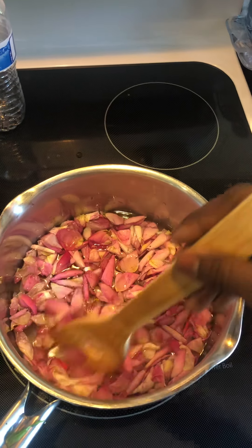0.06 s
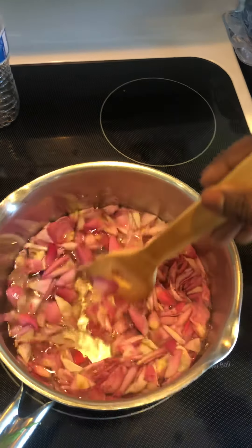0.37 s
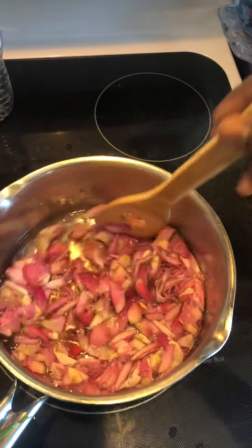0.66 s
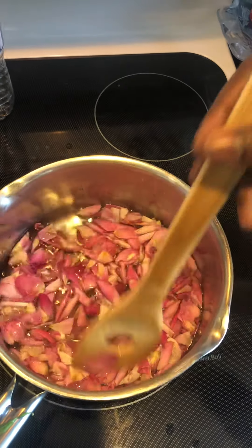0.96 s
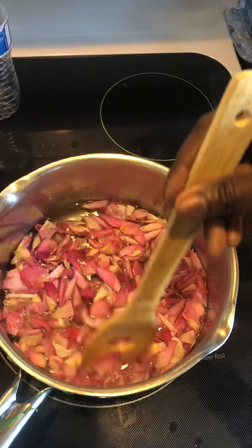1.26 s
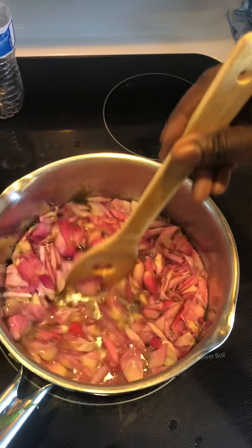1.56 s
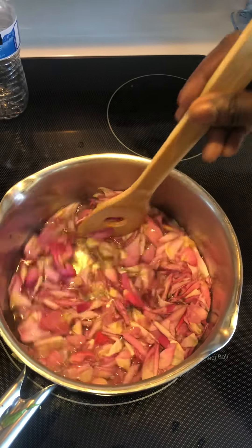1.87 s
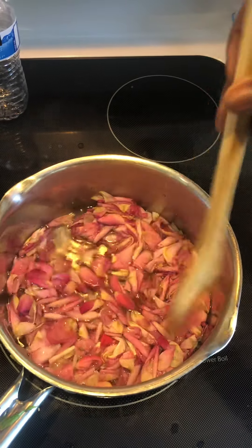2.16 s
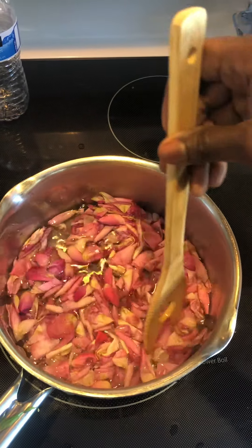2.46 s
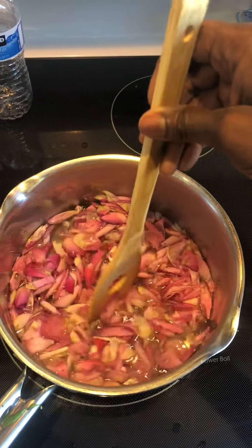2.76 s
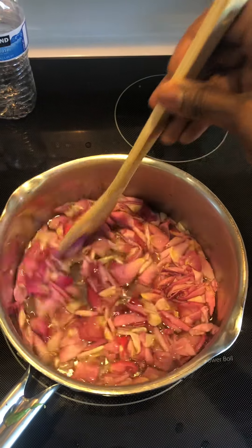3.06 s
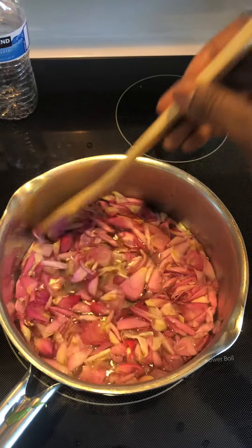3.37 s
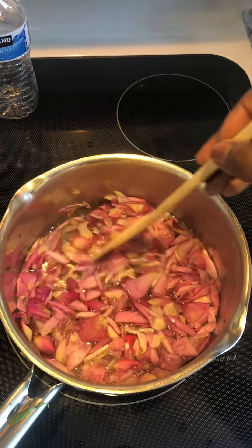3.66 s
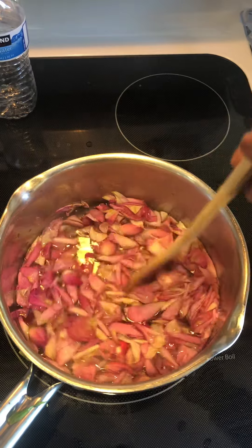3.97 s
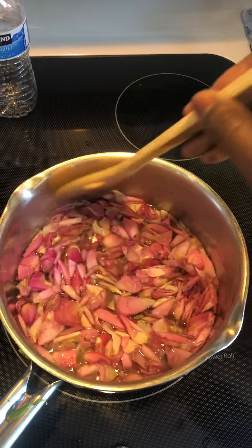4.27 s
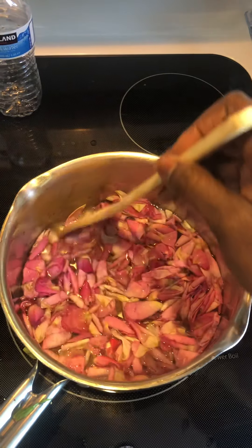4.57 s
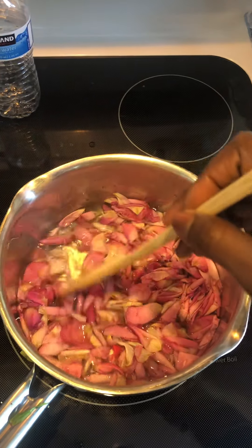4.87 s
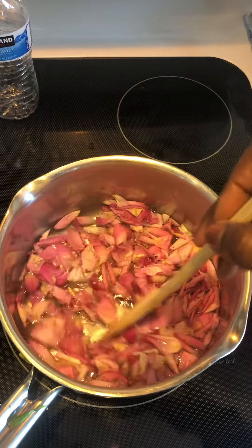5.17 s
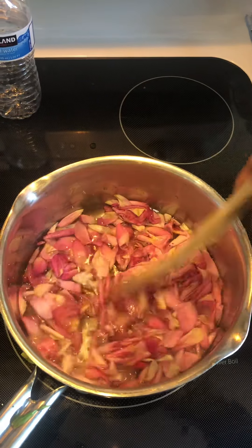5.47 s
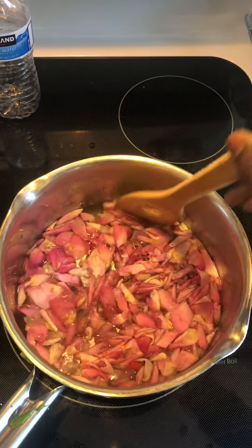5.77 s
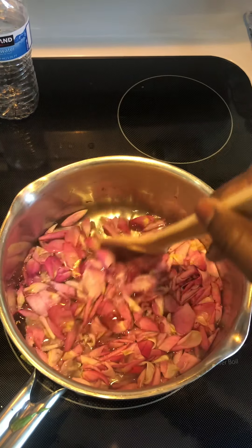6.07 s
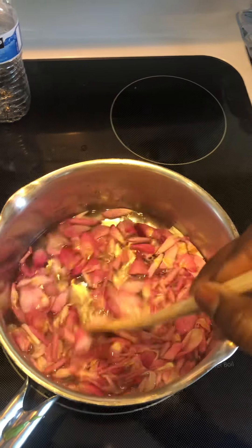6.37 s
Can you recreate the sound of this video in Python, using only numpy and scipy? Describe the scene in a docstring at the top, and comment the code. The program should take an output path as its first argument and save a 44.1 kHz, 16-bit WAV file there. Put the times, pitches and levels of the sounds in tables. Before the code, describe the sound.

Close to a saucepan in a small kitchen, an appliance hums low while onions in oil rustle and crackle quietly under a wooden spoon. Four spaced knocks of wood on steel stand out, each ringing briefly, the third running into a hoarse, squeaky scrape. Faint squeaks and tiny oil ticks come in between, and a few short scrapes and a soft clink finish the stirring.

```python
"""A wooden spoon stirs sliced onions in oil in a steel saucepan on a glass hob, in a small kitchen.
From the start an appliance hums, wet slices rustle, warm oil ticks and the wood squeaks faintly on steel.
The spoon knocks the pan ringing at 1 s, and again at 2.2 s with a light tap after it.
At 4.2 s it knocks and judders down the wall. A last knock and tap come at 5.7 s,
and a few short scrapes, a squeak and a low clink close the scene."""
import sys
import numpy as np
from scipy import signal
from scipy.fft import rfft, irfft, next_fast_len
from scipy.io import wavfile
from scipy.ndimage import map_coordinates

SR = 44100
rng = np.random.default_rng(int(sys.argv[2]) if len(sys.argv) > 2 else 0)


def store_pcm(level_fs):
    """Save levels as 16-bit WAV."""
    pcm = np.round(np.clip(level_fs, -1, 1) * 32767).astype(np.int16)
    wavfile.write(sys.argv[1], SR, np.atleast_2d(pcm).T)


N = 291526

# spectrum of crackling onions and oil: f/Hz, level/dB
CRACKLE_SPECTRUM = [(500, -7.5), (1500, -1.5), (2700, -3), (4000, -1.5), (7000, -5), (10000, -10),
                    (13000, -15.5), (16000, -15)]


def knocks(pan_db=1.0, spoon_db=0.5, pan_cycles=8.6, spoon_cycles=2.1, contact_db=-16.0, contact_hz=4500,
           twin_db=-16.0, twin_split=0.013, tail_db=-29.0, tail_t60=0.15, clatter_db=3.0):
    """Each blow clicks, cracks drily, rings the pan (damped by spoon and onions) and thumps the hob."""
    # where the spoon lands sets each register's drive and which modes are hit near a node or antinode:
    # t/s, drive/dB in five registers, share of the pan's ring time, thump/dB, thump lag/s,
    # [(mode f/Hz, lift/dB), ...]
    blows = [(1.0457, -4.5, -13, -20, -39, -41, 0.66, -45, 0.0044, [(1095, 8.5), (1409, 11.5), (1334, 2),
             (1541, 2), (699, -11), (620, -19), (897, -9), (2340, 3.5), (4740, -2.5)]),
             (2.1722, 0, 0, -4.5, 0, 2, 0.88, -54, 0.0005, [(1222, 6), (1334, 6.5), (1541, 5.5), (258, 6),
             (892, 1), (1002, 6), (1140, 4.5), (3596, 0), (430, 6)]),
             (2.3633, -40, -43, -32, -39.5, -34, 0.31, -80, 0.007, []),
             (4.242, 4, -2, -10, -23, -61, 0.65, -35, 0.0012, [(699, 4), (1095, -3), (236, 6), (462, -1),
             (528, -2), (1002, 4), (1334, 2.5), (1541, -28), (3596, -6), (2950, 7.5), (2600, 16),
             (4130, -1)]), (5.6827, -5.5, -3.5, -18.5, -20, -34, 1, -35, 0.0069, [(1409, 10), (1541, 6),
             (1925, 10.5), (462, -19), (430, -19), (499.6, 6.5), (1002, -1), (1095, -1), (236, 7.5),
             (2340, -0.5), (2920, -6), (3800, 10.5), (4740, -7), (5500, -8)]),
             (5.822, -29.5, -26, -28.5, -41.5, -33, 0.28, -51, 0.007, [(1990, 18), (1095, -8)])]
    # base, bowl, wall, crack and edge registers: f/Hz
    registers = [240, 510, 1200, 3600, 9000]
    # the wooden spoon's short modes: f/Hz, level/dB, t60/s
    spoon_modes = [(1095, -21, 0.085), (1990, -30.5, .035), (2340, -19.5, 0.042), (2600, -33, 0.031),
                   (2950, -24, 0.035), (3520, -20, 0.032), (3596, -17.5, 0.039), (3730, -21.5, 0.04),
                   (4040, -20, 0.041), (4740, -24.5, 0.023), (5450, -23.5, 0.017), (5770, -24.5, 0.017),
                   (6200, -26.5, 0.013), (7470, -22, 0.024), (8300, -21, 0.008)]
    # the steel pan's ringing modes: f/Hz, level/dB, t60/s
    pan_modes = [(124, -41.5, 0.41), (236, -33.5, 0.18), (258, -32.5, 0.2), (430, -34.5, 0.17),
                 (462, -26.5, 0.15), (486.7, -32, .12), (512, -25, 0.15), (620, -36.5, 0.066),
                 (698, -36.5, 0.34), (896, -41, 0.28), (1002, -36.5, 0.28), (1088, -35, .11),
                 (1140, -32, .1), (1222, -28, 0.13), (1334, -31.5, 0.31), (1409, -33, 0.18),
                 (1541, -30, 0.19), (1733, -45, .2), (1882, -34, 0.25), (2314, -39, .12), (2477, -39, 0.06),
                 (2697, -41, 0.13), (2770, -36, 0.11), (3215, -41, 0.13), (3630, -45, .14),
                 (3770, -44, 0.1), (4016, -47, 0.18)]
    # crowded modes in the crack of wood on steel, by octave: f/Hz, level/dB, t60/s
    crack_bands = [(189.5, -42, 0.19), (450, -37, 0.05), (698.6, -32, 0.055), (1300, -25.5, 0.075),
                   (3440, -18, 0.042), (6800, -21.5, 0.025), (11100, -27, 0.014)]
    out, t = np.zeros(N), np.arange(SR // 2) / SR
    near = lambda hz, centre: np.exp(-(np.log2(hz / centre) / .055) ** 2)
    click = np.cos(2 * np.pi * contact_hz * t) * np.exp(-2 * contact_hz * t)
    for s, *drive_db, ring_share, thump_db, thump_lag_s, lifts in blows:
        drive = lambda hz: from_db(np.interp(np.log(hz), np.log(registers), drive_db))
        blow = from_db(contact_db) * drive(contact_hz) * click
        bodies = (spoon_modes, spoon_db, spoon_cycles, 1), (pan_modes, pan_db, pan_cycles, ring_share)
        for modes, body_db, cycles, ring in bodies:
            for k, (hz, db, t60) in enumerate(modes):
                lift_db = sum(gain_db * near(hz, centre) for centre, gain_db in lifts)
                gain = (-1) ** k * from_db(body_db + db + lift_db) * drive(hz)
                attack = 1 - np.exp(-t * hz / cycles)   # low modes bloom later
                tone = np.sin(2 * np.pi * hz * t)
                if modes is pan_modes:   # handle and spouts split each mode into a beating pair
                    tone += from_db(twin_db) * np.sin(2 * np.pi * hz * (1 - twin_split) * t)
                blow += gain * attack * dying(t, t60 * ring) * tone
        clatter = from_db(tail_db + clatter_db * drift(rate=200)[:len(t)]) * dying(t, tail_t60)
        for hz, db, t60 in crack_bands:   # a fast burst, then a faint, uneven tail
            fade = dying(t, t60) + clatter
            crack = rms_one(octave_noise(hz, len(t)) * fade) * np.sqrt(np.mean(fade ** 2))
            blow += from_db(db) * drive(hz) * crack
        add(out, s, blow + from_db(thump_db) * thump(t, thump_lag_s))
    return signal.sosfilt(signal.butter(3, [90, 14500], "band", fs=SR, output="sos"), out)


def thump(t, lag_s, hz=155, rise_s=0.0056):
    """The glass hob gives under the pan just after the blow: a few low cycles."""
    age = np.maximum(t - lag_s, 0) / rise_s
    return (age * np.exp(1 - age)) ** 2 * np.sin(2 * np.pi * hz * t)


def judder(rate_jitter=.022, flare_db=4.0):
    """Wood sticks and slips down the wall: a hoarse stack of tones that arches with the pressure."""
    # the slide down the steel: t/s, slip rate/Hz, level/dB
    slide = [(4.27, 1790, -67), (4.305, 1900, -62), (4.335, 2130, -62), (4.36, 2200, -68),
             (4.395, 2150, -63), (4.43, 2070, -62.5), (4.46, 2040, -70), (4.48, 2030, -88)]
    # harmonics: multiple of the slip rate, level/dB
    harmonics = [(2, 1), (3, 2), (4, -2), (5, -13), (6, -12)]
    t = np.arange(N) / SR
    s, hz, db = np.transpose(slide)
    slip_hz = np.interp(t, s, hz) * (1 + rate_jitter * drift(rate=1500))
    phase = 2 * np.pi * np.cumsum(slip_hz) / SR
    tones = sum(from_db(tone_db + flare_db * drift(rate=70)) * np.sin(multiple * phase)
                for multiple, tone_db in harmonics)
    envelope = from_db(np.interp(t, s, db)) * (t > s[0]) * (t < s[-1])
    return envelope * rms_one(tones)


def scrapes(sink_per_s=0.34, grit_db=3.0, flare_db=5.5, clump_db=2.5):
    """Slipping wood grain excites resonances that flare, and their pitch sinks along each drag; wet slices
    swish beneath."""
    # wood dragging along steel: t/s, length/s, rub/dB, swish/dB
    drags = [(1.16, 0.06, -74, -80), (4.249, 0.25, -63.5, -64.5), (5.566, 0.07, -70, -71),
             (5.882, 0.097, -70.5, -70), (5.975, 0.062, -84, -66), (6.482, 0.085, -66, -68)]
    # resonances of the rubbing contact: f/Hz, width/Hz, level/dB
    rub_modes = [(3680, 300, 12), (4400, 390, 1.5), (5170, 340, 9), (6500, 270, 5.5), (7540, 195, -6),
                 (8460, 400, 8), (10800, 700, -22), (13370, 1000, -17)]
    # wet slices squeezed under the spoon: f/Hz, level/dB
    swish_spectrum = [(1500, -5), (4000, -4), (6500, -7), (9000, -8.5), (11500, -7), (16000, -16)]
    slips = grains(per_s=3000, spread_db=3.0) * from_db(grit_db * drift(rate=180))
    rub = rms_one(sum((-1) ** k * from_db(db + flare_db * drift(rate=36)) * resonate(slips, hz, width)
                      for k, (hz, width, db) in enumerate(rub_modes)))
    squelch = grains(per_s=3900, spread_db=-0.5) * from_db(clump_db * drift(rate=110))
    swish = coloured(squelch, swish_spectrum)
    out = np.zeros(N)
    for s, length, rub_db, swish_db in drags:
        t = np.arange(int(length * SR)) / SR
        pitch_ratio = 1 - sink_per_s * (t - length / 2)
        wood = from_db(rub_db) * map_coordinates(rub, [s * SR + np.cumsum(pitch_ratio)], order=3)
        slices = from_db(swish_db) * np.roll(swish, -int(s * SR))[:len(t)]
        add(out, s, signal.windows.tukey(len(t), .6) * (wood + slices))
    return out


def squeaks_and_clink(width_share=.06, rasp_db=2.0):
    """Brief pitched sounds of wood on steel: hoarse, gliding stick-slip squeaks and one low clink."""
    # the squeaks and the clink: middle t/s, length/s, level/dB, start f/Hz, end f/Hz
    contacts = [(0.263, 0.43, -72.5, 2336, 2350), (0.425, 0.068, -71.5, 2910, 3100),
                (1.12, 0.073, -79, 3520, 3500), (2.095, 0.057, -75, 2880, 2882),
                (5.101, 0.48, -80, 4200, 4560), (5.123, 0.31, -77.5, 7730, 6800),
                (6.507, 0.042, -64, 3700, 3680), (6.513, 0.039, -63, 790, 790)]
    out = np.zeros(N)
    for s, length, db, hz, end_hz in contacts:
        size = int(length * SR)
        band = resonate(rng.standard_normal(SR), hz, hz * width_share)
        tone = resonate(band, hz, 2 * hz * width_share)
        glide = map_coordinates(tone, [np.cumsum(np.linspace(1, end_hz / hz, size))], order=3)
        rough = rms_one(glide * from_db(rasp_db * drift(rate=300)[:size]))
        add(out, s - length / 2, from_db(db) * rough * signal.windows.tukey(size, .7))
    return out


def rustle(push_share=0.28, settling_db=-84.5, clump_db=3.5):
    """With each stroke wet slices part and slide over each other in small clumps of fine crackle."""
    # the spoon pushes through the onions: t/s, length/s, level at full speed/dB
    strokes = [(-0.12, 1.02, -70), (1.042, 0.37, -70.5), (1.24, 0.83, -73.5), (1.853, 0.72, -70),
               (2.03, 0.65, -71), (2.83, 0.25, -74.5), (3.117, 1.05, -71.5), (4.3, 0.71, -77),
               (4.846, 0.61, -69), (5.715, 0.21, -68.5), (6.084, 0.2, -71), (6.263, 0.25, -70)]
    t = np.arange(N) / SR
    power = from_db(settling_db) ** 2   # the slices keep shifting between strokes
    for s, length, db in strokes:
        speed = np.sin(np.pi / 2 * np.interp((t - s) / length, [0, push_share, 1], [0, 1, 0]))
        power = power + (from_db(db) * speed) ** 2
    crackle = grains(per_s=1300, spread_db=0.0) * from_db(clump_db * drift(rate=43))
    return np.sqrt(power) * coloured(crackle, CRACKLE_SPECTRUM)


def ticks(decay_s=0.0022, snap=4.7, skirt_db=-26.0):
    """Tiny sharp ticks of oil, wet slices and the spoon's light tap, each ringing for milliseconds."""
    # the clearest ticks: t/s, peak level/dB, f/Hz, width/Hz
    cues = [(0.045, -54.5, 5100, 1000), (0.1551, -46.5, 12800, 3000), (0.401, -44.5, 7060, 4000),
            (0.5046, -45.5, 9000, 6500), (0.687, -55, 12000, 6000), (0.808, -57, 14000, 4000),
            (1.091, -45, 3730, 1500), (1.2215, -53, 13600, 3960), (2.2825, -35, 6300, 1500),
            (2.2822, -50, 14800, 4000), (2.324, -58, 12000, 4000), (3.170, -51, 2650, 1800),
            (3.501, -55, 4800, 3000), (3.704, -53, 14000, 5000), (4.065, -51, 5150, 1500),
            (5.03, -45, 6000, 9100), (5.3100, -58, 5000, 900), (5.498, -48, 13000, 9000),
            (5.521, -48.5, 5880, 1300), (5.8227, -43.5, 13000, 7000), (6.2076, -50, 4400, 1970)]
    out, t = np.zeros(N), np.arange(SR // 20) / SR
    for s, db, hz, width_hz in cues:
        burst = rng.standard_normal(len(t)) * np.exp(-t / decay_s) + snap * (t == 0)
        broad = resonate(burst, hz, width_hz)
        tick = resonate(broad, hz, 2 * width_hz) + from_db(skirt_db) * broad
        add(out, s, from_db(db) * tick / np.abs(tick).max())
    return out


def sizzle(fizz_db=-84.0, swell_db=5.5, pop_db=-87.5, width_share=0.11):
    """The warm oil fizzes finely in little swells, and tiny bubbles pop, pitched by their size."""
    # pitch range of the bubbles: lowest f/Hz, highest f/Hz
    pop_range = (3000, 13000)
    fizz = grains(per_s=160, spread_db=3.5) * from_db(swell_db * drift(rate=5.5))
    pops = sum(resonate(grains(per_s=3.5, spread_db=0.5), hz, width_share * hz) / np.sqrt(hz)
               for hz in np.geomspace(*pop_range, 12))
    return from_db(fizz_db) * coloured(fizz, CRACKLE_SPECTRUM) + from_db(pop_db) * rms_one(pops)


def appliance(air_db=-54.5, waver_db=1.42, waver_rad=0.2):
    """Motor and mains lines waver slightly over a steady rush of air."""
    # lines of the hum: f/Hz, rms level/dB
    hum_lines = [(37.5, -76.5), (59.2, -64), (236.9, -69.5), (355.3, -68), (473.7, -70), (592.2, -78.5),
                 (710.6, -81), (845.2, -80.5), (1184.5, -73), (1421, -83.5), (6045, -89), (6164, -93.5),
                 (6223, -91.5)]
    # the appliance's air in the room: f/Hz, level/dB
    air_spectrum = [(25, -44.5), (48, -21), (78, -0.5), (95, -5), (118, 1), (145, -5), (200, -1.5),
                    (280, 1), (335, -9), (460, -9.5), (600, -15.5), (1150, -21), (2000, -30.5),
                    (3500, -33.5), (6300, -34), (16000, -45)]
    hum, t = np.zeros(N), np.arange(N) / SR
    for hz, db in hum_lines:
        gain = np.sqrt(2) * from_db(db + waver_db * drift(rate=14))
        hum += gain * np.sin(2 * np.pi * (hz * t + rng.random()) + waver_rad * drift(rate=2.2))
    return hum + from_db(air_db) * coloured(rng.standard_normal(N), air_spectrum)


def drone(motor_hz=172.2, mains_hz=118.2, waver_rad=.4):
    """A low motor tone sinks into the general hum, while the mains tone swells and fades."""
    # envelope of the motor tone: t/s, rms level/dB
    motor_envelope = [(0, -62), (1.4, -59), (2.0, -67), (6.61, -77)]
    # envelope of the mains tone: t/s, rms level/dB
    mains_envelope = [(0, -66), (1.0, -58), (1.7, -58), (2.5, -56.5), (2.9, -64), (3.301, -62),
                      (4.3, -55.5), (4.9, -61), (6.61, -63)]
    out, t = np.zeros(N), np.arange(N) / SR
    for hz, envelope in (motor_hz, motor_envelope), (mains_hz, mains_envelope):
        gain = np.sqrt(2) * from_db(np.interp(t, *np.transpose(envelope)))
        out += gain * np.sin(2 * np.pi * hz * t + waver_rad * drift(rate=6.8))
    return out


def kitchen(x, wet_db=-17.5, t60=0.42, build_s=0.0027):
    """Dense reflections from hob, wall and cupboards build up and die away."""
    # colour of the reverb: f/Hz, level/dB
    room_spectrum = [(100, 3.5), (300, 7.5), (1200, 5), (2500, -1), (8000, -6), (10000, -9.5), (16000, -9)]
    t = np.arange(SR * 3 // 5) / SR
    envelope = (1 - np.exp(-t / build_s)) * dying(t, t60)
    echoes = coloured(rng.standard_normal(len(t)), room_spectrum) * envelope
    return x + from_db(wet_db) * signal.fftconvolve(x, echoes / np.linalg.norm(echoes))[:N]


def grains(per_s, spread_db):
    """Tiny clicks at random times, their levels scattered by spread_db."""
    sizes = from_db(spread_db * np.minimum(rng.exponential(1, N), 4))
    return (rng.random(N) < per_s / SR) * sizes * rng.choice([-1, 1], N)


def drift(rate):
    """A random wander of roughly unit size, with `rate` turning points a second."""
    knots = rng.standard_normal(32768)
    return np.interp(np.arange(N) / SR * rate, np.arange(len(knots)), knots)


def octave_noise(hz, size):
    """One octave of noise; rms 1."""
    edges = np.minimum([hz / np.sqrt(2), hz * np.sqrt(2)], .45 * SR)
    band = signal.butter(2, edges, "band", fs=SR, output="sos")
    return rms_one(signal.sosfilt(band, rng.standard_normal(size)))


def coloured(x, spectrum):
    """Shape a noisy signal with a smooth EQ curve; rms 1."""
    hz, db = np.transpose(spectrum)
    size = next_fast_len(len(x))
    bins = np.maximum(np.fft.rfftfreq(size, 1 / SR), 1)
    gain = from_db(np.interp(np.log(bins), np.log(hz), db))
    return rms_one(irfft(rfft(x, size) * gain, size)[:len(x)])


def resonate(x, hz, width_hz):
    """One resonance, gain 1 at its peak."""
    r = np.exp(-np.pi * width_hz / SR)
    feedback = [1, -2 * r * np.cos(2 * np.pi * hz / SR), r * r]
    return signal.lfilter(np.array([1, 0, -1]) * (1 - r * r) / 2, feedback, x + 1e-18)


def dying(t, t60):
    """A free decay that loses 60 dB in t60."""
    return np.exp(-np.log(1000) * t / t60)


def from_db(db):
    """Decibels to gain."""
    return 10 ** (np.asarray(db) / 20)


def rms_one(x):
    """Scale to an rms of one."""
    return x / np.sqrt(np.mean(x ** 2) + 1e-20)


def add(out, s, sound):
    """Mix a sound in at s seconds."""
    at = int(round(s * SR))
    out[at:at + len(sound)] += sound[:N - at]


def scene():
    """The pan up close with a little room on it, over a bed of hum; mono."""
    pan = knocks() + ticks() + rustle() + sizzle() + scrapes() + judder() + squeaks_and_clink()
    return (kitchen(pan) + appliance() + drone())[None]


def record(dry, cutoff_hz=16100):
    """A steep low-pass takes off the very top."""
    return signal.sosfilt(signal.ellip(10, .1, 80, cutoff_hz, fs=SR, output="sos"), dry)


dry = scene()
out = record(dry)
store_pcm(out)
```